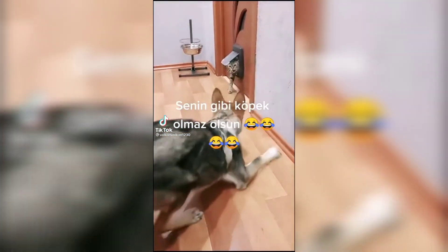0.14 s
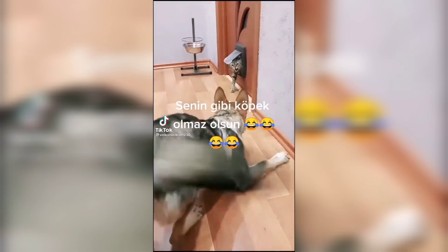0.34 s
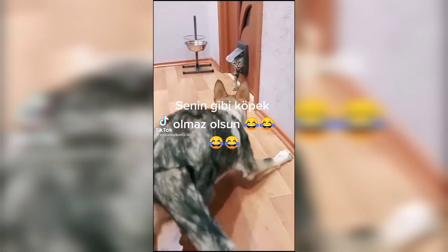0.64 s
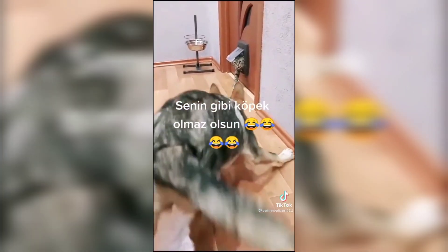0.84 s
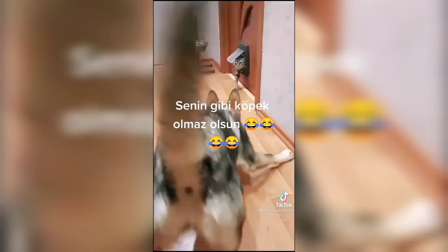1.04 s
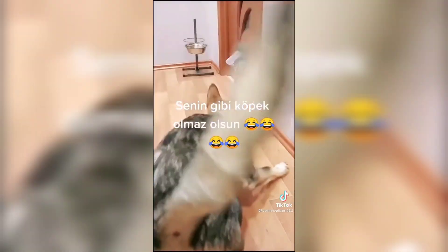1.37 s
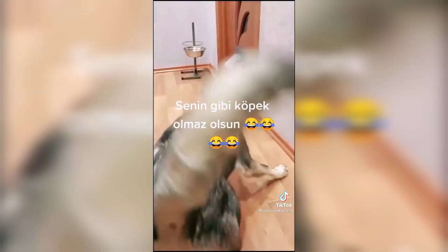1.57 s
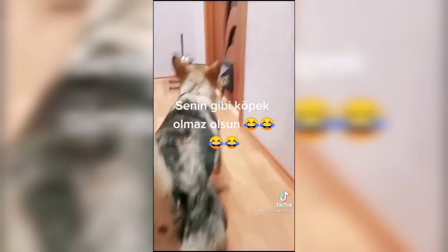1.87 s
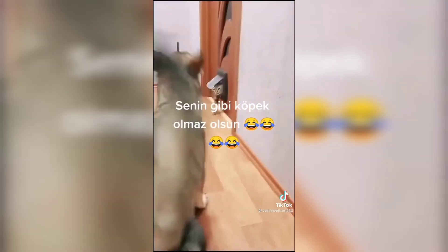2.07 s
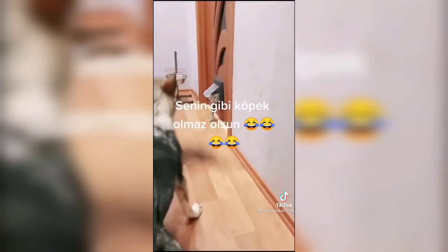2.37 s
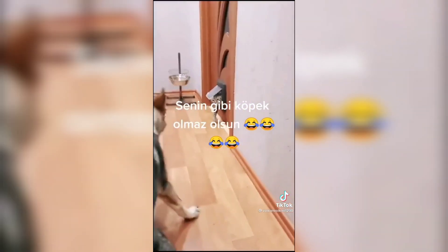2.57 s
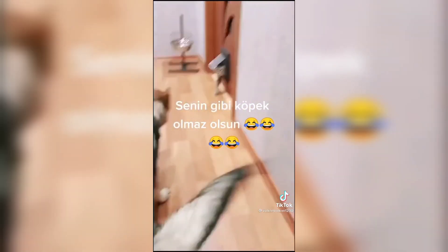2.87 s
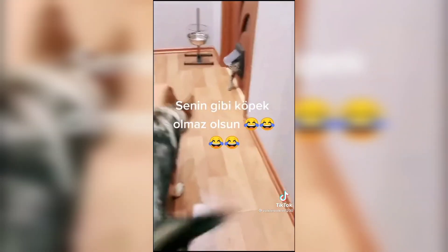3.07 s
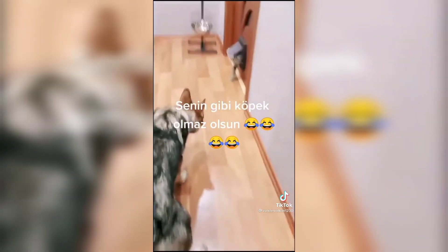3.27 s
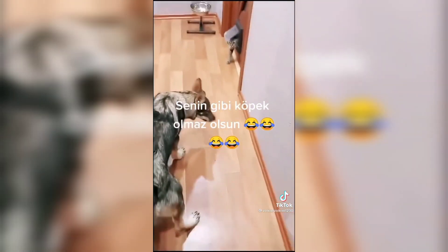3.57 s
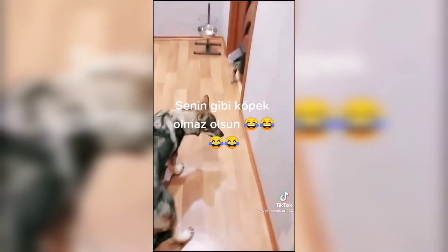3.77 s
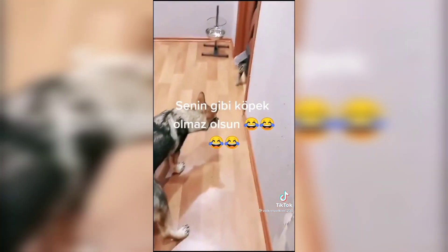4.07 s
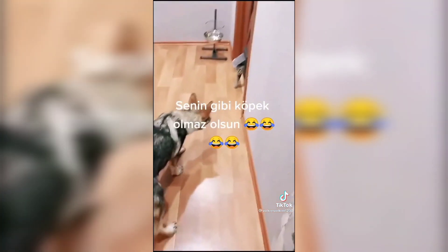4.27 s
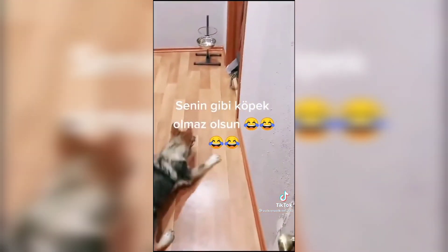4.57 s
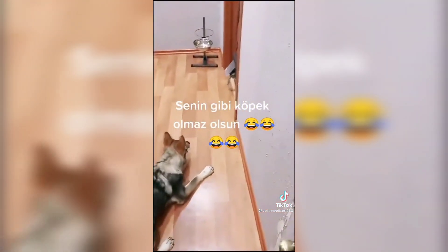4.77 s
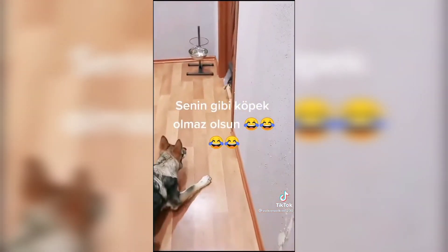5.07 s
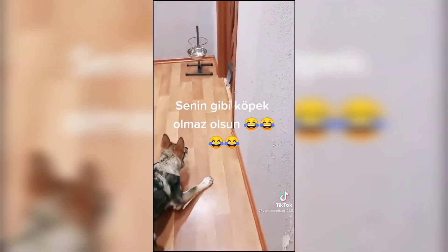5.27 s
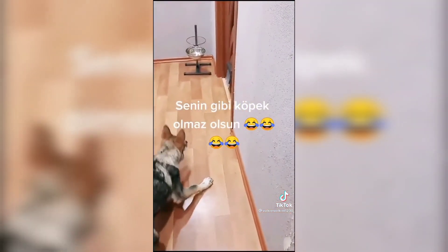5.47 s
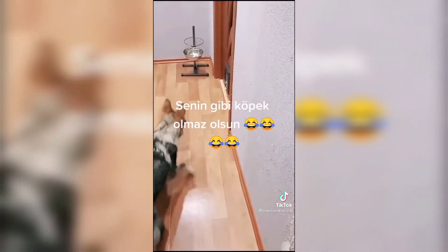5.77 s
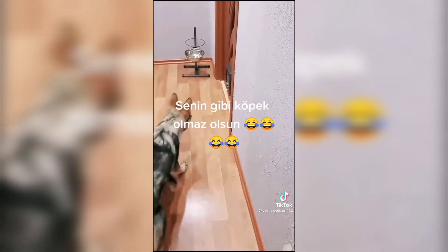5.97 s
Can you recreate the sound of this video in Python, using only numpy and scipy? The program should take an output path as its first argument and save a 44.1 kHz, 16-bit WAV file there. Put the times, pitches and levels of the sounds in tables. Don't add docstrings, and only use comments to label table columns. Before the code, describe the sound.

A small room with a hard wooden floor, short reverberation and faint air hiss. At 0 s an earlier bark rings away under a breath and a paw thud; claws scrape and click around 0.5 s, and heavier thuds land near 0.8 s. From 1 s a farther dog moans softly upward through closed lips, while a nearer dog starts a low growl at 1.2 s. It cracks into rough, nasal yelps from 1.6 s, a strained whine at 2.1-2.6 s and the highest yelp at 2.7 s, sinking into a faint grumble. The far dog's clear howl begins about 2.4 s, rises slightly by 3.4 s and holds steady to 4.4 s, over light paw steps. Then a loud, harsh bark bursts out, with a gravelly growl under its tail until 4.9 s. A long soft outbreath follows around 5 s. At 5.6 s comes a sharp sneeze with a floor stamp, then small paw and claw taps.

```python
import sys
import numpy as np
from scipy import signal
from scipy.io import wavfile
from scipy.ndimage import uniform_filter1d

SR = 44100
rng = np.random.default_rng(int(sys.argv[2]) if len(sys.argv) > 2 else 0)


def waveform_to_disk(signal):
    frames = np.transpose(np.atleast_2d(signal))
    scaled = np.clip(frames, -1, 1) * 32767
    samples = np.round(scaled).astype(np.int16)
    wavfile.write(sys.argv[1], SR, samples)


def invert_db(level):
    return 10 ** (np.asarray(level, dtype=float) / 20)


N = 270774

# f/Hz, density/dB per Hz
AIR = [(24, -23), (40, -9), (637, -41.5), (797, -32), (2060, -33.5), (2450, -31), (7340, -23.5),
       (15500, -33)]
AIR_DB = -68
# f/Hz, t60/s
ROOM = [(120, 0.24), (500, 0.27), (2000, 0.37), (8000, 0.1)]
# peak t/s, 20 dB rise/s, 20 dB fall/s, level/dB
FLOOR = [(0.12, .15, .32, -36.5), (0.7, .9, .15, -60), (0.84, .035, .2, -36), (1.25, .15, .07, -40),
         (1.35, .1, .3, -58), (1.77, .07, .1, -45), (2.03, .3, .1, -49.5), (2.44, .16, .13, -51.5),
         (2.89, .45, .25, -54), (3.69, .28, .09, -57), (4.29, .1, .18, -43.5), (4.51, .025, .2, -34.5),
         (4.7, .1, .18, -42), (5.61, .06, .7, -48.5), (5.97, .3, .12, -62)]
# f/Hz, density/dB per Hz
BOARDS = [(15, -41.5), (25, -24), (54, -28), (92, 28), (216, -20.5), (243, -41.5), (303, -38.5),
          (340, -51.5), (400, -40), (520, -61), (880, -120)]
# peak t/s, 20 dB rise/s, 20 dB fall/s, level/dB
SCRAPE = [(0.26, .08, .9, -55), (0.46, .5, .12, -53), (0.62, .05, .07, -60), (3.494, .06, .05, -52),
          (3.55, .1, .2, -68), (5.868, .008, .09, -62)]
# f/Hz, width/Hz, level/dB
PLANK = [(440, 120, -1), (810, 320, -3), (955, 88, -0.5), (1800, 200, -19)]
# t/s, peak level/dB, ring f/Hz, t60/s
PAWS = [(0.08, -28, 90, 0.4), (0.541, -52, 128, 0.22), (0.571, -48.5, 215, 0.15), (0.807, -23.5, 96, 0.14),
        (0.84, -29.5, 94.1, 0.53), (0.963, -32.5, 109, 0.18), (2.41, -48, 190, .15), (2.59, -56, 200, .15),
        (3.14, -52, 155, .25), (3.485, -46, 170, 0.15), (3.569, -52.5, 161.3, 0.2), (3.66, -45, 94.6, 0.2),
        (3.72, -50.5, 138.5, 0.18), (3.98, -64, 150, .25), (5.593, -57, 80, 0.18),
        (5.588, -26, 214.6, 0.11), (5.77, -48.5, 95, 0.15), (5.855, -43.5, 130.7, 0.26),
        (5.929, -40.5, 83, 0.16)]
# t/s, peak level/dB, ring f/Hz
TICKS = [(0.541, -38, 764), (0.573, -38, 786), (5.593, -18, 1030), (5.866, -47, 950), (5.868, -50, 1350)]
# f/Hz, level/dB, t60/s
EARLIER = [(212.6, 10, 0.3), (662, 5, 0.36), (838, -2, 0.4), (1055, 10, 0.35), (1283, 5, 0.3),
           (1960, 1, 0.55), (1900, 7, 0.51), (1895, -23.5, 0.17), (2120, 13.5, 0.29), (2180, -16, 1),
           (2590, 3, 0.3), (3050, -1, 0.3), (3300, -5, 0.3)]
HOLD_S = .06
ECHO_BEAT_DB, ECHO_BEAT_S = 4.2, .004

# peak t/s, 20 dB rise/s, 20 dB fall/s, rush level/dB, hiss re rush/dB
PANT = [(0.04, .3, .2, -44, -17), (0.19, .25, .3, -68, 12.5), (0.374, .25, .2, -52, -12),
        (0.686, .13, .22, -60, -.5), (0.922, .03, .13, -65, 1.5), (1.03, .08, .12, -62, -20),
        (2.73, .05, .08, -60, 8), (3.4, .1, .6, -84, 17), (3.658, .3, .15, -64, -1),
        (3.844, .06, .11, -68, 15), (4.29, .17, .2, -66, 5), (4.402, .03, .08, -38, -17),
        (4.49, .08, .36, -43, -19), (4.68, .15, .12, -52, -18), (4.6, .2, .09, -68, 9),
        (5.5, .04, .2, -63, -18), (5.612, .04, .085, -33, -7.5), (5.72, .1, .15, -57, -10),
        (5.882, .1, .3, -69.5, -1.5)]
SIGH = [
    (1.25, .16, .15, -64, 7),
    (5.06, .36, .3, -47.5, -9),
]
# f/Hz, density/dB per Hz
RUSH = [(120, -30.5), (200, -8), (281, 0), (519, -9), (624, -1), (762, -7.5), (1720, -2.5), (6000, -17.5),
        (7800, -25.5), (13200, -120)]
# f/Hz, density/dB per Hz
HISS = [(2060, -34), (3500, -4), (6210, -0.5), (8370, -9), (9660, -6.5), (11200, -11.5), (13800, -13),
        (15500, -22)]

# t/s, pitch f/Hz, level/dB, lips 0 shut - 1 parted, second partial level/dB
MOAN = [(0.955, 158, -56, .1, -3), (1.012, 176, -48, .3, -5), (1.104, 188, -47, .7, -2),
        (1.146, 210, -50, .95, 5), (1.176, 245, -52, .6, 1), (1.25, 350, -51, .3, 4),
        (1.31, 425, -50, .2, 5), (1.39, 530, -46, .1, -4), (1.474, 593, -51, .05, -6),
        (1.56, 612, -48, .2, -8), (1.7, 630, -52, .9, -2), (1.76, 640, -35, .5, -4),
        (1.83, 640, -44, .5, -2), (1.915, 650, -30, .3, -8), (1.97, 640, -48, .9, -2),
        (2.1, 635, -51, .8, -3), (2.36, 650, -54, .9, -2)]
# f/Hz, level/dB
CLOSED = [(150, 0), (750, 1), (950, -4), (1250, -5), (1600, -24), (2300, -18), (2850, 0), (3600, -30)]
SHUT_TILT_DB = -14
# t/s, pitch f/Hz, level/dB, lips 0 shut - 1 parted, tongue 0 back - 1 forward
HOWL = [(2.4, 502, -54, .2, .3), (2.56, 497, -44, .3, .2), (2.66, 492, -43, .3, .2),
        (2.9, 494, -44, .1, .4), (3.03, 508, -39, .4, .3), (3.13, 527, -42, .3, .6),
        (3.27, 553, -42, .8, .4), (3.36, 575, -40, 1.0, .45), (3.424, 576, -40, .7, .65),
        (3.554, 587, -39, 1.0, .5), (3.63, 581, -39, 1.0, .58), (3.74, 580, -41, .85, .2),
        (3.88, 577, -42, .4, .45), (4.0, 577, -41, .2, .25), (4.09, 572, -37, .45, .35),
        (4.19, 564, -40, .0, .55), (4.35, 573, -40, .0, .8), (4.39, 575, -40, .1, .85)]
# multiple of pitch, level/dB
UPPER = [(1, -13), (2, -3), (3, 0), (4, -10), (5, -5.5), (6, -7), (7, -14), (8, -16), (9, -14), (10, -16),
         (11, -18.5), (12, -30), (13, -34), (14, -34), (16, -34), (20, -38)]
OVERTONES_DB, BRIGHT_DB = -5, 3
LIPS_DB, TONGUE_DB = -15, 24
RING_HZ, RING_WIDTH_HZ, RING_DB = 5200, 350, 9
NULLS_S = [3.07, 3.424, 3.646, 3.895]
NULL_WIDTH_S, NULL_DB = .03, -22
VEIL_DB, VEIL_S, VEIL_LIFT_S, CHEEK_HZ = -8, 2.9, .3, 2970
BREATH_VEIL, THICKEST_VEIL = .0042, .4

# t/s, centre f/Hz, level/dB
LEAKS = [
    [(0.9, 2650, -70), (1.05, 2650, -73), (1.17, 2700, -66), (1.3, 2680, -70), (1.45, 2900, -71),
     (1.56, 2800, -74)],
    [(1.2, 2400, -68), (1.35, 2320, -70), (1.46, 2150, -69), (1.52, 1850, -65), (1.58, 1850, -60)],
]
LEAK_WIDTH_HZ = 380
# t/s, pitch f/Hz, effort/dB, jaw 0 shut - 1 wide
YELPING = [
    [(1.2, 101, -42, .39), (1.348, 114, -32.5, .03), (1.428, 118, -32.5, .1), (1.496, 121, -27.5, .02),
     (1.56, 128, -29, .05), (1.58, 242, -26, .2)],
    [(1.588, 381, -31.5, 1.0), (1.606, 445, -18, .55), (1.63, 505, -21.5, .5), (1.67, 525, -16, .53),
     (1.712, 514, -17, .56), (1.735, 490, -24, .66), (1.752, 255, -28, .75), (1.78, 224, -26, .53)],
    [(1.797, 240, -27, .75), (1.812, 435, -23, .7), (1.842, 505, -19.5, .64), (1.868, 615, -17, .66),
     (1.897, 600, -18, .7), (1.937, 495, -21, .66), (2.012, 455, -28, .65), (2.026, 240, -28, .6),
     (2.045, 260, -27, .74)],
]
WHINING = [
    [(2.06, 385, -27, .61), (2.1, 413, -23, .56), (2.208, 413, -23.5, .66), (2.288, 449, -18.5, .42),
     (2.362, 486, -28, .84), (2.4, 628, -19.7, .53), (2.47, 554, -20, .6), (2.63, 558, -35, .6)],
    [(2.648, 566, -37, .77), (2.658, 613, -19.4, .69), (2.7, 754, -23.5, .8), (2.735, 780, -23.3, .86),
     (2.77, 569, -18, .54), (2.797, 471, -16, .47), (2.835, 435, -22.5, .47), (2.87, 299, -32, .75),
     (2.905, 163, -30, .51)],
    [(2.97, 160, -44.5, .37), (3.08, 151, -65, .64), (3.2, 145, -82, .45)],
]
BARKING = [
    [(4.2, 101, -66, .48), (4.3, 111, -52, .44), (4.345, 192, -38, .38), (4.372, 268, -29, .24)],
    [(4.38, 368, -32, .95), (4.39, 494, -22.5, .8), (4.408, 554, -20, .61), (4.432, 621, -16, .76),
     (4.46, 628, -21, .74), (4.51, 630, -24, .7), (4.56, 632, -32, .78), (4.66, 630, -45, .8)],
    [(4.45, 125, -45, .61), (4.486, 121, -26.5, .41), (4.534, 106, -29, .55), (4.6, 86, -25.5, .55),
     (4.66, 85, -23, .52), (4.794, 85, -35, .45), (4.9, 81, -78, .7)],
]
THROAT = [.72, 1.1, 1.02, .95, .95, 1.0, .9, 1.32, .33]
HOARSE = [.2, .09, .36, .02, .03, .2, .3, .2, .55]
GLIDE_ROUGH, GLIDE_S, ROUGHEST = .038, .045, .85
# t/s, added roughness 0-1, depth of a slow second beat 0-1
SLIP = [(1.2, 0, 0), (1.56, .2, 0), (1.6, .12, .2), (1.635, -.05, 0), (1.685, -.05, 0), (1.71, .3, .3),
        (1.75, .35, .5), (1.8, .2, .2), (1.84, -.15, .2), (1.87, -.2, .6), (1.94, -.15, .7), (1.98, .1, .4),
        (2.05, .1, .2), (2.11, -.03, 0), (2.24, 0, 0), (2.35, -.04, 0), (2.385, -.1, .2), (2.44, .05, .3),
        (2.48, 0, 0), (2.63, .01, 0), (2.66, -.05, .3), (2.72, -.12, .2), (2.77, -.05, .5), (2.82, 0, .2),
        (4.38, 0, .2), (4.42, -.06, .25), (4.5, -.02, .3), (4.58, -.1, .1)]
BEAT_HZ = 125
# f/Hz, width/Hz, level/dB
CHEST = [(248, 230, 6), (670, 260, -14)]
# f/Hz, width/Hz, level/dB
MOUTH = [(1065, 840, 17.5), (1742, 370, 20), (2100, 510, 6.5), (2903, 690, -11), (3760, 200, -9)]
# f/Hz, width/Hz, level/dB
NOSE = [(5815, 570, 12.5), (6370, 389, 18), (6820, 1860, 7.5), (10700, 5000, -20)]
SHUT_DB, WIDE_DB = -40, 15
# t/s, factor on first resonance, factor on upper ones, lift of upper ones/dB
TONGUE = [(1.6, 1.15, 1.02, -3), (1.64, .82, 1.1, -6), (1.685, .82, 1.1, -4), (1.72, 1.02, 1.02, 2),
          (1.8, 1.1, 1.02, -3), (1.86, .98, .98, -3), (1.9, 1.05, .94, -2), (1.95, .98, 1.02, -1),
          (2.05, 1.02, 1.02, -1), (2.11, 1.05, 1.02, -1), (2.15, 1.1, .99, 6), (2.22, 1.1, 1.01, 6),
          (2.29, .9, 1.02, -7), (2.36, .9, 1.02, -7), (2.42, 1.02, 1.05, 2), (2.48, 1.02, 1.02, 3),
          (2.66, 1.05, 1.08, 2), (2.72, 1.4, 1.1, -4), (2.79, .98, 1.05, 1), (2.9, .98, 1.02, -1),
          (4.4, 1.02, .92, 2), (4.43, .85, .85, -7), (4.6, .85, .85, -5)]
# t/s, lift/dB
TEETH = [(1.58, 0), (1.7, 0), (2.0, 2), (2.1, -4), (2.35, -3), (2.6, -1), (2.72, 2), (2.9, 2), (4.38, 8),
         (4.43, 15), (4.6, 17)]
# t/s, level/dB, centre f/Hz
NOSTRILS = [
    [(1.57, -64, 5860), (1.6, -41, 6220), (1.678, -45, 6320), (1.708, -38, 6230), (1.796, -48, 6150),
     (1.808, -40, 6340), (1.916, -41, 6500), (2.042, -49, 5840), (2.06, -43, 5860)],
    [(2.061, -42, 5800), (2.203, -39, 6420), (2.237, -44, 6480), (2.293, -42, 6410), (2.385, -47, 6210),
     (2.415, -54, 6580), (2.449, -42, 6680), (2.459, -50, 6660), (2.5, -50, 6830)],
    [(2.501, -49, 6610), (2.513, -44, 6630), (2.637, -62, 6520), (2.645, -51, 6520), (2.715, -37, 6200),
     (2.721, -30, 6200), (2.807, -45, 6200), (2.919, -52, 5880), (2.97, -62, 5980)],
    [(4.37, -48, 6260), (4.408, -36, 6460), (4.514, -52, 6610), (4.574, -55, 5970), (4.62, -62, 6000)],
]
# t/s, level/dB, centre f/Hz
MUTE = [(1.55, -82, 6300), (3.0, -66, 6300), (4.34, -66, 6300), (4.65, -66, 6300)]
NOSE_REST_HZ, NOSE_SWING = 6300, .6
# t/s, level/dB
SHEEN = [(1.56, -85), (1.62, -70), (1.8, -72), (1.9, -62), (2.0, -74), (2.35, -74), (2.42, -61),
         (2.55, -63), (2.63, -72), (2.73, -56), (2.9, -74), (3.0, -90), (4.36, -85), (4.41, -59),
         (4.52, -80)]


def evened(x):
    return x / np.sqrt(np.mean(x ** 2) + 1e-20)


def steadied(x, s):
    return x / np.sqrt(abs(uniform_filter1d(x ** 2, int(s * SR))) + 1e-9)


def read(points, hz):
    f, value = np.transpose(points)
    return np.interp(np.log(hz + 1), np.log(f + 1), value)


def along(rows, t):
    s, *columns = np.transpose(rows)
    return [np.interp(t, s, c) for c in columns]


def unroll(rows):
    s = np.transpose(rows)[0]
    t = np.arange(max(s[0], 0), s[-1], 1 / SR)
    return t, along(rows, t)


def edges(t, fade_s):
    return np.minimum(np.minimum(t - t[0], t[-1] - t) / fade_s, 1)


def add(mix, s, sound):
    part = mix[round(s * SR):][:len(sound)]
    part += sound[:len(part)]


def wander(n, s):
    size = int(s * SR)
    once = uniform_filter1d(rng.standard_normal(n), size, mode="wrap")
    return evened(uniform_filter1d(once, size, mode="wrap"))


def swells(rows, column, order=1):
    t = np.arange(0, N, 16) / SR
    gain = 0
    for row in rows:
        away = np.maximum((row[0] - t) / row[1], (t - row[0]) / row[2])
        gain = gain + invert_db(sum(row[3:4 + column]) - 20 * away ** order)
    return np.interp(np.arange(N) / SR, t, gain)


def noise(n, colour, patchy_db):
    hz = np.fft.rfftfreq(1024, 1 / SR)
    a, b, patches = rng.standard_normal((n // 256 + 5, 513, 3)).T
    patches = evened(uniform_filter1d(uniform_filter1d(patches, 10, 0), 8, 1))
    z = (a + 1j * b) * invert_db(read(colour, hz)[:, None] + patchy_db * patches)
    return evened(signal.istft(z, nperseg=1024, noverlap=768)[1][:n])


def cavity(x, modes, first=0, scale=1):
    out = 0
    for k, (hz, width, db) in enumerate(modes):
        centre = np.maximum(hz * scale, first * (k == 0)) * np.ones(len(x))
        turn = np.exp(2j * np.pi * np.cumsum(centre) / SR)
        r = np.exp(-np.pi * width / SR)
        smooth = signal.lfilter([(1 - r) ** 3], np.poly([r, r, r]), x / turn + 1e-18)
        out = out + (-1) ** k * invert_db(db) * (turn * smooth).real
    return out


def still_air():
    return invert_db(AIR_DB) * noise(N, AIR, 3.5)


def room(x):
    taps = np.zeros(SR)
    at = np.arange(200, SR - 20, 20)
    taps[at + rng.integers(0, 20, len(at))] = rng.choice([-1., 1.], len(at))
    hz, t, z = signal.stft(taps, SR, nperseg=256)
    decay = invert_db(-60 * t / read(ROOM, hz)[:, None])
    tail = signal.istft(z * decay, SR, nperseg=256)[1]
    return signal.fftconvolve(x, tail / np.linalg.norm(tail))[:N]


def earlier_bark():
    t = np.arange(SR // 2) / SR
    ring = 0
    for hz, db, t60 in EARLIER:
        level_db = db - 60 * np.maximum(t - HOLD_S, 0) / t60 + ECHO_BEAT_DB * wander(len(t), ECHO_BEAT_S)
        ring = ring + invert_db(level_db) * np.sin(2 * np.pi * (hz * t + rng.random()))
    return 0, invert_db(-42) * ring * np.minimum(t * 250, 1)


def boards():
    return invert_db(-0.5) * swells(FLOOR, 0) * steadied(noise(N, BOARDS, 1.0), 0.22)


def scrape():
    ticks = (rng.random(N) < 150 / SR) * rng.standard_normal(N)
    drag = evened(ticks) + 0.82 * rng.standard_normal(N)
    return swells(SCRAPE, 0) * evened(cavity(drag, PLANK))


def paw(s, db, hz, t60):
    t = np.arange(SR // 3) / SR
    ring = np.sin(2 * np.pi * hz * t) * invert_db(-60 * t / t60) * np.minimum(t / 0.0053, 1)
    claws = invert_db(-32.5 - 60 * t / 0.14) * noise(len(t), RUSH, 7.5)
    return s, invert_db(db) * (ring + claws)


def tick(s, db, hz):
    t = np.arange(SR // 8) / SR
    crack = uniform_filter1d(rng.standard_normal(len(t)), size=6) * invert_db(-60 * t / .05)
    ring = np.sin(2 * np.pi * hz * t) * invert_db(-3 - 60 * t / .07)
    return s, invert_db(db - 6) * (crack + ring) * np.minimum(t / .0015, 1)


def pant():
    rush, hiss = (swells(PANT, column) + swells(SIGH, column, order=3) for column in range(2))
    return invert_db(4.0) * rush * noise(N, RUSH, 1.48) + invert_db(6.0) * hiss * noise(N, HISS, 2.4)


def moaning(k, hz, t, lips, second_db):
    shut_db = SHUT_TILT_DB * (1 - lips) * min(k - 1, 2)
    return read(CLOSED, k * hz) + (second_db if k == 2 else shut_db)


def howling(k, hz, t, lips, tongue):
    nulls = NULL_DB * sum(np.exp(-((t - s) / NULL_WIDTH_S) ** 2) for s in NULLS_S)
    overtones = OVERTONES_DB + BRIGHT_DB * (lips - .5)
    moving = {1: LIPS_DB * (lips - .5), 2: nulls, 3: TONGUE_DB * (tongue - .5)}.get(k, overtones)
    hidden = np.clip(1 - (t - VEIL_S) / VEIL_LIFT_S, 0, 1)
    off_cheek = 1 - np.exp(-((k * hz - CHEEK_HZ) / 200) ** 2)
    veil = VEIL_DB * (k > 3) * hidden * off_cheek
    ring = RING_DB * np.exp(-((k * hz - RING_HZ) / RING_WIDTH_HZ) ** 2)
    return np.interp(k, *np.transpose(UPPER)) + moving + veil + ring


def far_dog(rows, colour, count, muzzle_hz):
    t, (hz, level_db, *mouth) = unroll(rows)
    turns = np.cumsum(hz * (1 + .002 * wander(len(t), .012))) / SR
    voice = 0
    for k in range(1, count + 1):
        db = level_db + colour(k, hz, t, *mouth)
        veil = 1 + min(BREATH_VEIL * k * k, THICKEST_VEIL) * wander(len(t), 0.0014)
        damped_db = 45 * np.maximum(np.log2(k * hz / muzzle_hz), 0)
        flutter_db = (1.6 + 0.2 * k) * wander(len(t), 0.021)
        gain = invert_db(db - damped_db + flutter_db) * veil
        voice = voice + np.sqrt(2) * gain * np.cos(2 * np.pi * (k * turns + rng.random()))
    return t[0], voice * edges(t, .015)


def leak(rows):
    t, (hz, level_db) = unroll(rows)
    air = evened(cavity(rng.standard_normal(len(t)), [(1, LEAK_WIDTH_HZ, 0)], scale=hz))
    return t[0], invert_db(level_db) * air * edges(t, .02)


def vocal_folds(hz, rough, beat):
    n = len(hz)
    jitter = (rough + .03) * .1 * wander(n, 0.0037)
    turns = np.cumsum(hz * (1 + jitter) + 9.0 * rough * wander(n, .02)) / SR
    folds = 0
    for k in range(1, 36):
        folds = folds + np.cos(2 * np.pi * k * turns + .3 * k * k) * (k * hz < 14000)
    folds = steadied(folds, .03) * invert_db(6.0 * rough * wander(n, .005))
    beat_turns = np.cumsum(BEAT_HZ * (1 + .15 * wander(n, .02))) / SR
    folds = folds * (1 + beat * np.cos(2 * np.pi * beat_turns))
    puffs = evened((0.88 + np.exp(-(turns % 1) / 0.27)) * rng.standard_normal(n))
    return folds, puffs


def near_dog(calls):
    rows = [(*row, throat, hoarse) for table, throat, hoarse in calls for row in table]
    t, (hz, effort_db, jaw, opening, hoarse) = unroll(rows)
    back, front, lift_db = along(TONGUE, t)
    slip, beat = along(SLIP, t)
    teeth_db, sheen_db = along(TEETH, t)[0], along(SHEEN, t)[0]
    nose_rows = MUTE + [tuple(row) for call in NOSTRILS for row in call]
    nose_db, whistle_hz = along(sorted(nose_rows), t)

    glide = uniform_filter1d(abs(np.gradient(np.log(hz))) * SR, int(GLIDE_S * SR))
    rough = np.clip(hoarse + slip + GLIDE_ROUGH * glide, .01, ROUGHEST)
    folds, puffs = vocal_folds(hz, rough, beat)

    share_db = SHUT_DB + (WIDE_DB - SHUT_DB) * jaw
    chest_db = effort_db - 10 * np.log10(1 + invert_db(share_db) ** 2)
    mouth_db = chest_db + share_db

    chest = cavity(folds + 1.1 * rough * puffs, CHEST, first=hz)
    blown = folds + .8 * (rough + .03) * puffs
    low = cavity(blown, MOUTH[:1], scale=opening * back)
    middle = cavity(blown, MOUTH[1:2], scale=opening * front)
    top = invert_db(teeth_db) * cavity(blown, MOUTH[2:], scale=opening * front)
    mouth = low - invert_db(lift_db) * (middle - top)
    whistle = folds + 2.4 * (rough + .07) * puffs
    nostrils = 1 + NOSE_SWING * (whistle_hz / NOSE_REST_HZ - 1)
    nose = cavity(whistle, NOSE[:3], scale=nostrils)
    sheen = cavity(whistle + puffs, NOSE[3:])

    parts = [(chest, chest_db), (mouth, mouth_db), (nose, nose_db), (sheen, sheen_db)]
    voice = sum(invert_db(db) * steadied(x, .04) for x, db in parts)
    return t[0], voice * edges(t, .02)


def scene():
    near, far, rest = np.zeros((3, N))
    add(rest, *earlier_bark())
    for row in PAWS:
        add(near, *paw(*row))
    for row in TICKS:
        add(near, *tick(*row))
    add(far, *far_dog(MOAN, moaning, count=5, muzzle_hz=4000))
    add(far, *far_dog(HOWL, howling, count=20, muzzle_hz=11000))
    for rows in LEAKS:
        add(rest, *leak(rows))
    calls = list(zip(YELPING + WHINING + BARKING, THROAT, HOARSE))
    for breath in (calls[:-3], calls[-3:-1], calls[-1:]):
        add(near, *near_dog(breath))
    wet = room(invert_db(-9.0) * near + invert_db(-10.0) * far)
    mix = near + far + wet + rest + pant() + boards() + scrape() + still_air()
    return mix[None]


def band_limit(x):
    return signal.sosfilt(signal.butter(12, 15710, fs=SR, output="sos"), x)


def record(dry):
    bass_cut = signal.butter(2, 62, "high", fs=SR, output="sos")
    top_cut = signal.firwin(511, 15600, window=("kaiser", 9), fs=SR)
    thinned = signal.sosfilt(bass_cut, dry)
    thinned = signal.oaconvolve(thinned, top_cut[None], "same")
    return band_limit(thinned)


dry = scene()
out = record(dry)
waveform_to_disk(out)
```